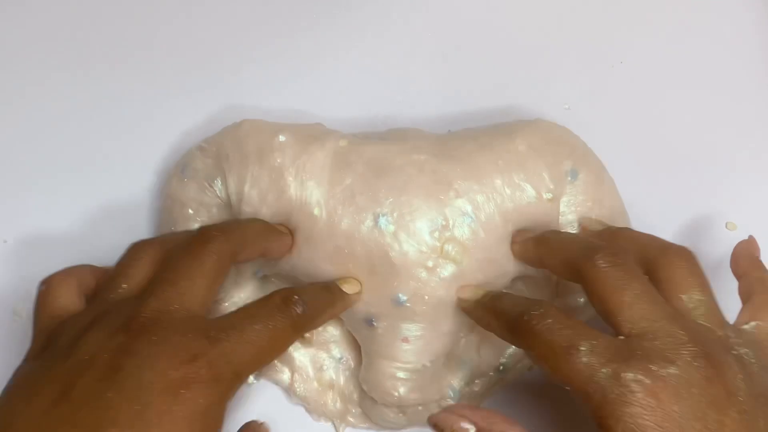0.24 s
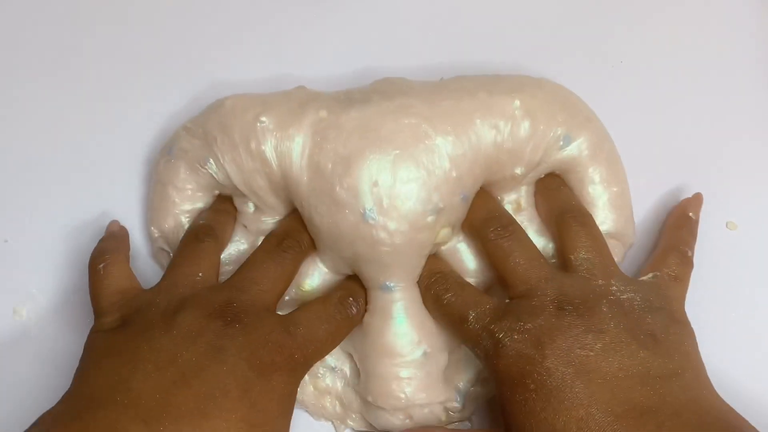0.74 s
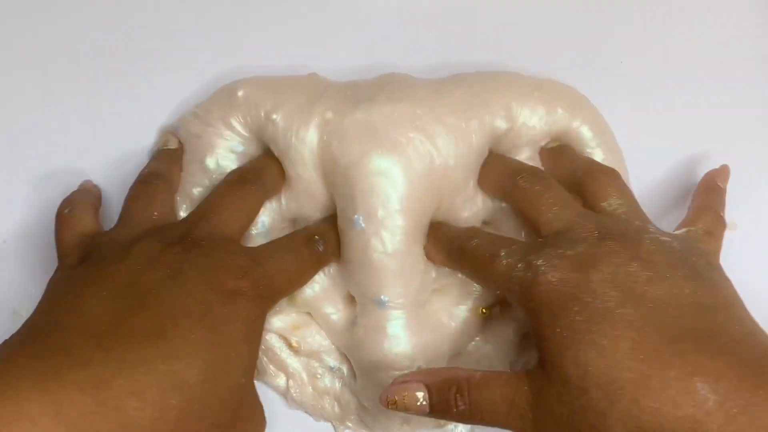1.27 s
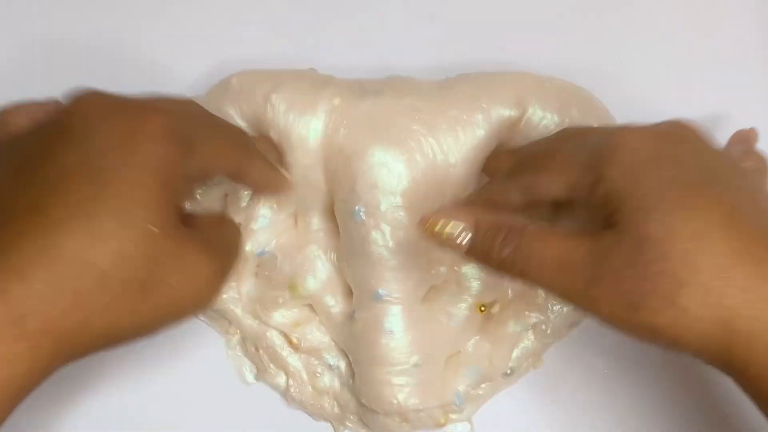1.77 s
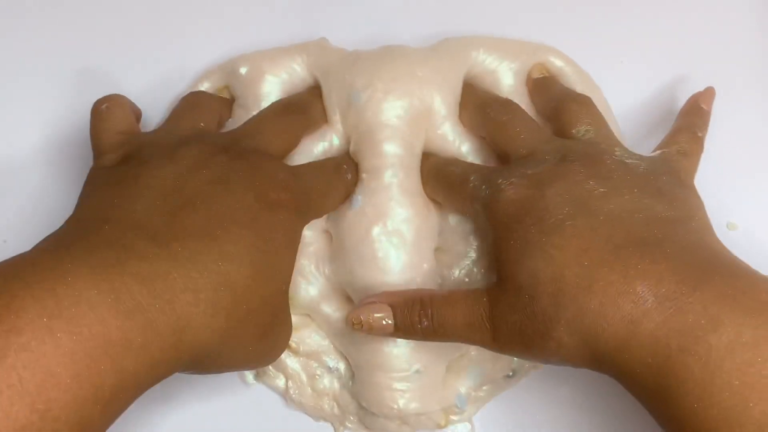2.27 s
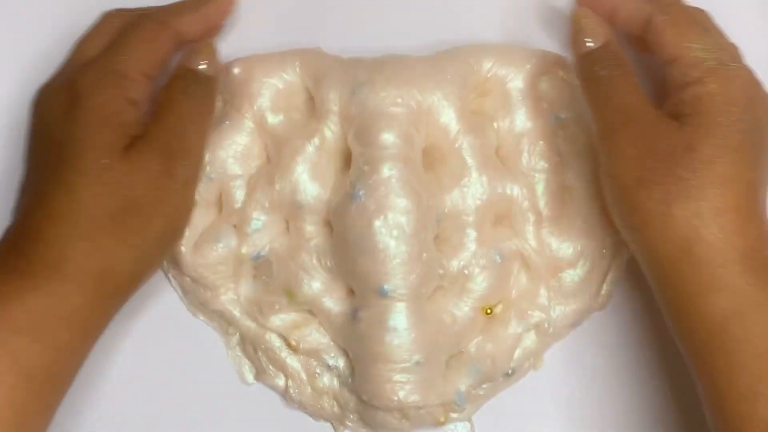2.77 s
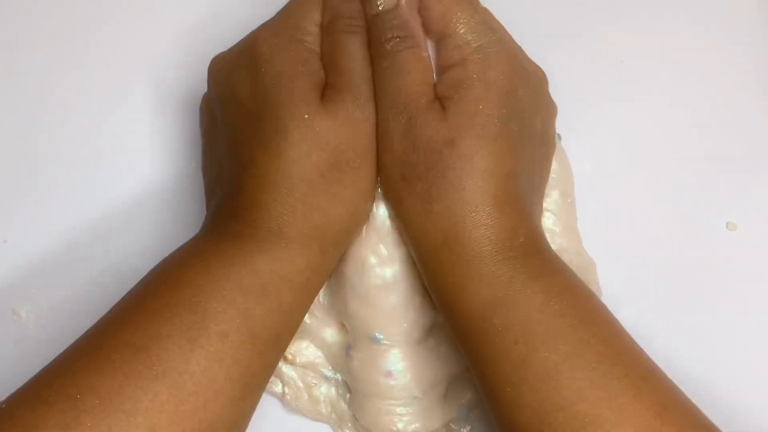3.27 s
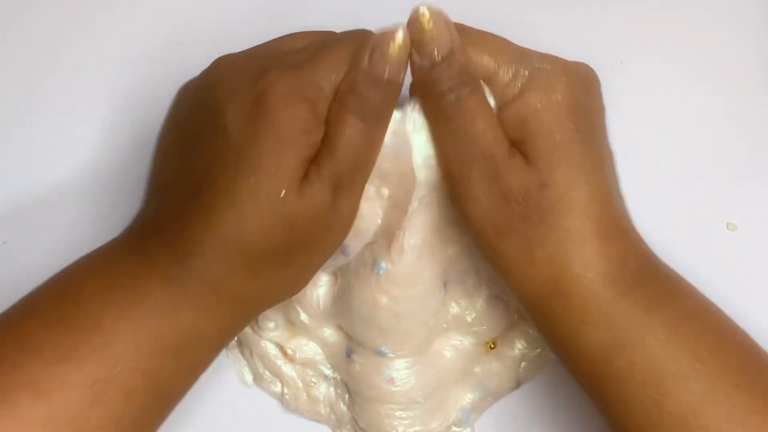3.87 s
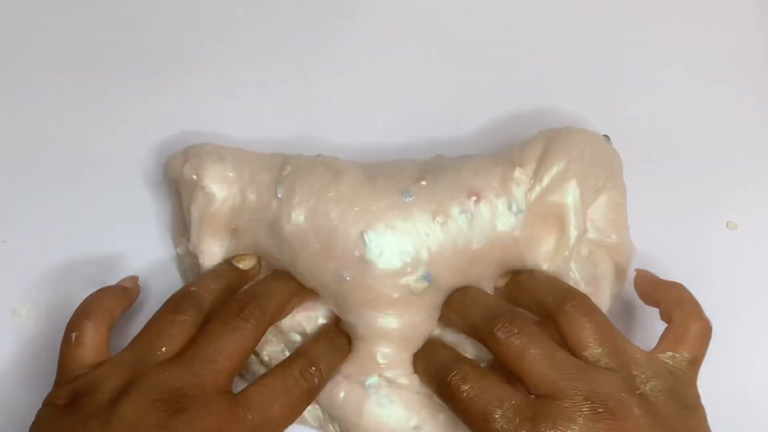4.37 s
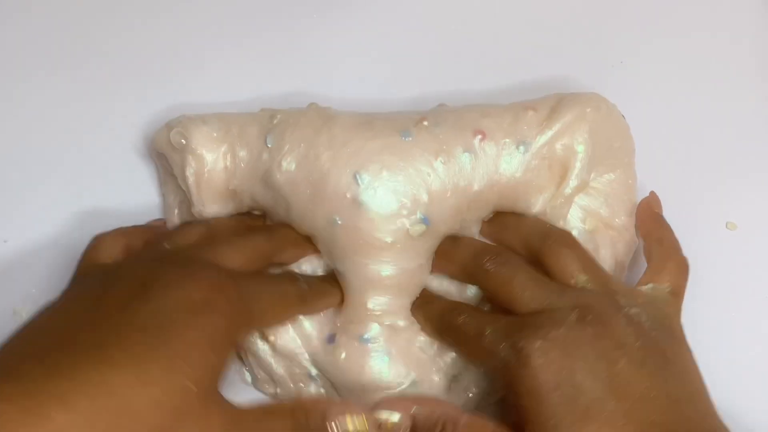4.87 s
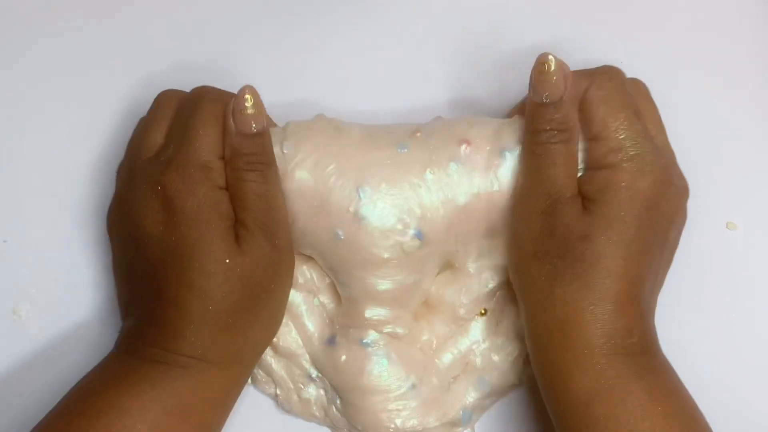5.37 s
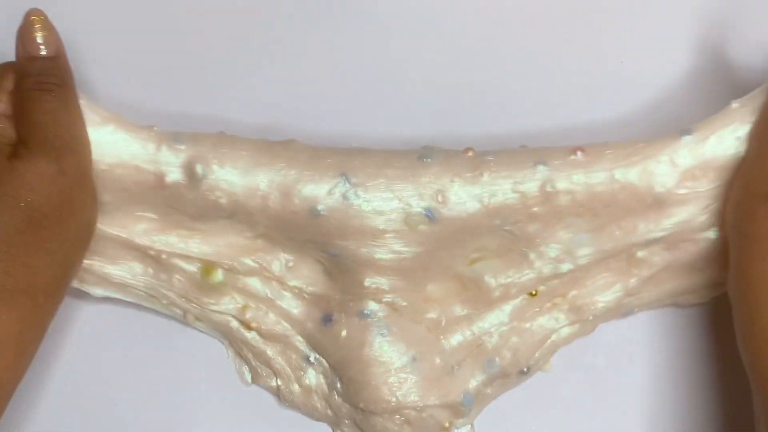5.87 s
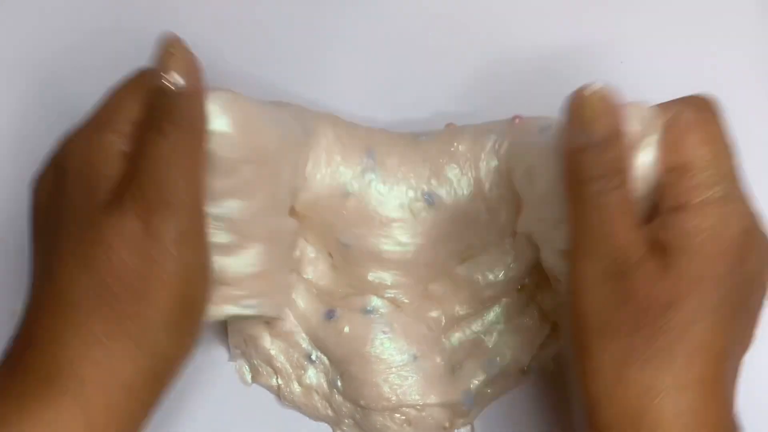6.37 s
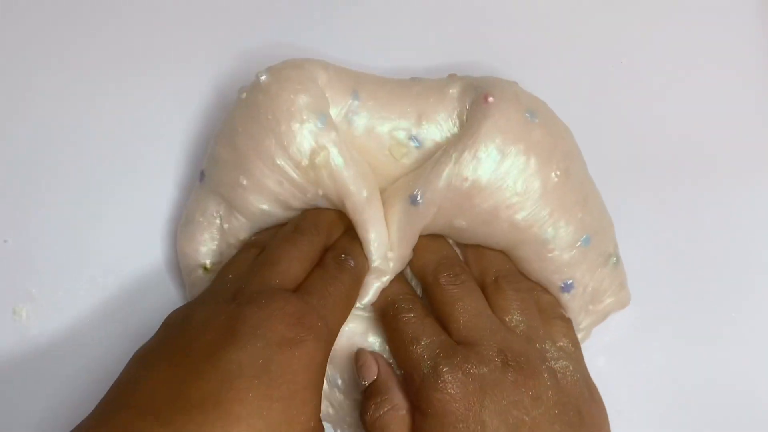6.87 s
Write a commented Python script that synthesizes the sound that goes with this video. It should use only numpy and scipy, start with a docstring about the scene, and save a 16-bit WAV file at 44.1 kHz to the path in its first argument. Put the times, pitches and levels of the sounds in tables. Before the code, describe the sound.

Close, dry indoor sound of hands working a big lump of wet slime on a table, with faint steady hiss. A low, padded thump and wet squelch open at 0 s; similar presses follow at 0.9, 1.7 and 2.5 s, the third with juicier pops, with quiet sticky ticks and small soft bumps between. From 2.7 s the slime is swept together with wet smearing; at 3.1-3.6 s squeezing bursts trapped air in a dense volley of loud, sharp, crackling pops, harshest around 3.4 s and distorting slightly. Folding smears and fizzes until 4 s. Quieter fingering and nudges lead to another deep press at 4.9 s. From 5.1 s the slime is gripped and stretched, with bright snaps and crackles strongest at 5.5 and 5.9 s, thinning past 6.1 s. The last second is soft sticky handling, faint ticks and gentle bumps, with short small-room echoes.

```python
"""A low table thump and a wet squelch open the scene: two hands press soft slime, five times in all.
Between and after the presses they fold and stretch it: noise through drifting resonances smears, random
snaps fizz. Trapped bubbles burst as sharp pops, each a noise tear coloured by its air pocket; small ones tick.
Pops and squelches gain short echoes of a small room; the microphone is close and peaks clip at full scale."""
import sys
import numpy as np
from scipy import signal
from scipy.fft import rfft, irfft, next_fast_len
from scipy.io import wavfile
from scipy.ndimage import uniform_filter1d

SR = 44100
rng = np.random.default_rng(int(sys.argv[2]) if len(sys.argv) > 2 else 0)


def file_out(sig):
    """Save sig as 16-bit WAV at sys.argv[1]."""
    # one column per channel
    cols = np.atleast_2d(sig).T
    # limit, then scale
    lim = np.clip(cols, -1, 1)
    pcm = np.round(lim * 32767).astype(np.int16)
    wavfile.write(sys.argv[1], SR, pcm)


N = 314433

# Both hands press down. Each row: time in s, fingers in dB, palms in dB, palm pitch in Hz, sway against the
# palms in dB, squelch in dB before the mix gain, pocket pitch in Hz, treble setting in dB, squelch fall in s.
PRESSES = [(0.004, -16.5, -3, 98.8, -1.5, -22, 1280, -4, 0.033),
           (0.896, -10.5, -3, 102, -10.5, -15.5, 5830, -13, 0.018),
           (1.712, -10.5, -14, 89, 6.5, -15, 1920, -4, 0.016),
           (2.522, -19.5, -6.5, 105.6, 0, -18.5, 1110, -4.5, 0.031),
           (4.888, -12, -5.5, 107.5, -8, -23.5, 1430, -5, 0.028)]
# slime held off the table passes on less pocket bass and rumble
LIFT_START_S, LIFT_END_S, LIFTED_BASS_DB, LIFTED_RUMBLE_DB = 5.43, 6.12, -11, -0.5
LEAD_S = 1 / 4  # squelches and thumps start this long before their nominal time


def amp(db):
    """Decibels to gain."""
    return 10 ** (np.asarray(db) / 20)


def evened(x):
    """Scales to rms 1."""
    return x / np.sqrt(np.mean(x ** 2) + 1e-20)


def read(points, hz):
    """Interpolates (Hz, value) points on a log-frequency axis."""
    f, value = np.transpose(points)
    return np.interp(np.log(hz + 1), np.log(f + 1), value)


def add(mix, s, sound):
    """Mixes a sound in from time s, cutting what falls outside."""
    start = round(s * SR)
    sound = sound[max(-start, 0):]
    part = mix[max(start, 0):][:len(sound)]
    part += sound[:len(part)]


def play(table, source, lead_s=0):
    """Sounds every row of a table, each lead_s before its time."""
    out = np.zeros(N)
    for s, *row in table:
        add(out, s - lead_s, source(*row))
    return out


def bins(x):
    """Frequencies of the spectrum of x."""
    return np.fft.rfftfreq(len(x), 1 / SR)


def colour(x, db):
    """Minimum-phase filter from a dB curve: whatever rings comes after the blow."""
    cepstrum = irfft(np.log(amp(np.maximum(db, -100))), len(x))
    cepstrum[1:len(x) // 2] *= 2
    cepstrum[len(x) // 2 + 1:] = 0
    return irfft(rfft(x) * np.exp(rfft(cepstrum)), len(x))


def cavity(hz, centre_hz, q):
    """Resonance gain, 1 at its centre."""
    return 1 / np.sqrt(1 + (q * (hz / centre_hz - centre_hz / (hz + 1))) ** 2)


def tone(hz, bass_db, treble_db):
    """Broad colour of escaping air, in dB."""
    points = [(60, bass_db - 17), (300, bass_db + 3.5), (750, bass_db), (2000, 0.26), (3500, 1.0),
              (5200, treble_db / 2 + 0.5), (8000, treble_db + 2), (15000, treble_db - 4.5)]
    return read(points, hz)


def lifted(s):
    """Whether the slime is held off the table at time s."""
    return (s > LIFT_START_S) & (s < LIFT_END_S)


def bass(s, pitch_hz):
    """Bass setting of an air pocket in dB, from its pitch and whether the slime lies on the table."""
    # Each row: pocket pitch in Hz, bass in dB.
    pocket_bass = [(600, 12.5), (900, 12), (2000, -2.5), (3500, 0.5), (7500, 4), (13000, -3)]
    return read(pocket_bass, pitch_hz) + LIFTED_BASS_DB * lifted(s)


def with_bass(table):
    """Gives each air pocket of a table its bass."""
    return [(s, db, hz, bass(s, hz), *rest) for s, db, hz, *rest in table]


def crackle(size, per_s, spread_db, hiss):
    """Countless tiny films snap, a few of them large, over a little steady hiss."""
    chance, strength = rng.random(size), rng.exponential(1, size)
    polarity, air = np.sign(rng.normal(size=size)), rng.normal(size=size)
    snaps = (chance < per_s / SR) * amp(spread_db * np.minimum(strength, 3)) * polarity
    return evened(evened(snaps) + hiss * air)


def wet_crackle(size, per_s, spread_db, hiss, clump_db=2.0, q=3.15):
    """Tiny bubbles of 14 pitches burst in clumps, each with its own short ring, over hiss."""
    bubble_hz = np.geomspace(500, 14000, num=14)
    hz = np.fft.rfftfreq(size, 1 / SR)
    spectrum = np.zeros(len(hz), complex)
    for pitch_hz in bubble_hz:
        chance, strength = rng.random(size), rng.exponential(1, size)
        bursting = chance < per_s / len(bubble_hz) / SR
        bursts = np.where(bursting, amp(spread_db * np.minimum(strength, 3)), 0)
        spectrum += rfft(bursts) / (1 + 1j * q * (hz / pitch_hz - pitch_hz / (hz + 1)))
    bubbles = evened(irfft(spectrum, size))
    clumps = evened(uniform_filter1d(uniform_filter1d(rng.standard_normal(size), 200), 150))
    wet = bubbles + hiss * rng.standard_normal(size)
    return evened(wet * amp(clump_db * np.clip(clumps, -2, 2)))


def drifting_gaps(x, q=9, drift=.1):
    """Narrow gaps between skin and slime resonate; their pitches wander, so the smear sounds wet."""
    # Each row: centre in Hz, boost in dB.
    gaps = [(800, 3), (1150, 3.5), (1500, 7), (2050, 10.5)]
    hz, when, z = signal.stft(x, SR, nperseg=1024, noverlap=768)
    for centre_hz, db in gaps:
        wander = evened(uniform_filter1d(uniform_filter1d(rng.standard_normal(len(when)), 16), 10))
        z = z * amp(db * cavity(hz[:, None], centre_hz * np.exp(drift * wander), q))
    return signal.istft(z, SR, nperseg=1024, noverlap=768)[1][:len(x)]


def hands():
    """Levels in dB of leaning, smearing and sticking over time, with resting noise; powers add."""
    # Fingertips pull free and dig in. Each row: start in s, end in s, smearing in dB, sticky fizz in dB.
    fingering = [(0.197, 0.6, -57.5, -65), (1.11, 1.46, -56.5, -62.5), (1.982, 2.2, -53.5, -59.5),
                 (4.063, 4.164, -57.5, -55.5), (4.457, 4.704, -54.5, -62), (6.417, 7.1, -58, -57)]
    # Strokes. Each row: time in s, smearing in dB, sticky fizz in dB. All levels precede the handling gains.
    gather = [(2.70, -44, -70), (2.78, -39, -57.5), (2.88, -40.5, -56), (2.95, -27, -30), (3.09, -38, -39),
              (3.3, -38.5, -36), (3.46, -38, -24.5), (3.58, -44.5, -33.5), (3.69, -56, -51)]  # sweep together and squeeze
    fold = [(3.689, -51, -46), (3.77, -35, -30.5), (3.85, -35, -29.5), (3.941, -40, -41),
            (4.021, -57.5, -55)]  # fold over
    stretch = [(5.09, -50.5, -68), (5.111, -46, -59), (5.26, -42, -56.5), (5.36, -39.5, -40.5),
               (5.46, -42, -38), (5.54, -42, -36), (5.72, -39.5, -29.5), (5.79, -50.5, -44.5),
               (5.92, -52.5, -33), (6.04, -72, -60), (6.31, -52, -44), (6.5, -54, -55)]  # slide to the ends, grip, pull wide, let back
    resting_db = (-67.5, -64)  # faint low noise, steady microphone hiss
    fingering_ease_s = 0.094
    # skin rubs around each press: smearing and fizz against its squelch level
    rub_offset_db, rub_swell_db_per_s, rub_fade_db_per_s = (-12.5, -15.5), 286, 184
    # the weight stays on after a press and eases off
    lean_db, lean_db_per_s = -25.5, -32
    # the table rumbles with the smearing, over a little rumble of its own
    drag_db, table_rest_db = 10, -43.5

    t = np.arange(N) / SR
    power, leaning = amp(resting_db)[:, None] ** 2, 0
    for start, end, *levels in fingering:
        active = np.clip(np.minimum(t - start, end - t) / fingering_ease_s + .5, 0, 1)
        power = power + amp(levels)[:, None] ** 2 * active
    for stroke in (gather, fold, stretch):
        s, *levels = np.transpose(stroke)
        stroke_power = np.array([amp(np.interp(t, s, db)) ** 2 for db in levels])
        power = power + stroke_power * (t >= s[0]) * (t < s[-1])
    for s, _, _, _, _, squelch_db, *_ in PRESSES:
        rub_db = squelch_db - np.maximum(rub_swell_db_per_s * (s - t), rub_fade_db_per_s * (t - s))
        power = power + (amp(rub_offset_db)[:, None] * amp(rub_db)) ** 2
        leaning = leaning + (t > s) * amp(lean_db + lean_db_per_s * abs(t - s)) ** 2
    drag = amp(drag_db + LIFTED_RUMBLE_DB * lifted(t)) ** 2 * power[0]
    weight = amp(table_rest_db) ** 2 + leaning + drag
    return 10 * np.log10([weight, *power])


def handling(weight_db, smearing_db, sticking_db, rumble_gain_db=0, smear_gain_db=1, fizz_gain_db=1):
    """Weight shifts rumble on the table, skin smears over the slime, its sticky surface fizzes over hiss."""
    # Noise colours. Each row: frequency in Hz, relative density in dB.
    rumble_colour = [(10, -17), (25, -2.5), (35, -0.5), (50, -6.5), (75, -8.5), (108, -7), (150, -22.5),
                     (250, -27.5), (500, -33.5), (1200, -79)]
    smear_colour = [(120, -15.5), (300, 1), (600, 2.5), (800, 2), (1000, -7.5), (1450, -3), (1750, -12),
                    (2050, -7), (2800, -15.5), (5000, -30.5)]
    fizz_colour = [(1200, -31.5), (2400, -4), (3400, 9), (5000, 3), (7800, 5.5), (10500, -2), (15500, 1),
                   (17000, -8)]
    size = next_fast_len(N, real=True)
    noise = rng.standard_normal(size)
    hz = bins(noise)
    rumble = evened(colour(noise, read(rumble_colour, hz)))[:N]

    sliding = wet_crackle(size=size, per_s=3000, spread_db=5.5, hiss=.5)
    smear = evened(drifting_gaps(colour(sliding, read(smear_colour, hz))))[:N]

    films = crackle(size=size, per_s=900, spread_db=8, hiss=.5)
    bubbles = wet_crackle(size=size, per_s=1400, spread_db=8, hiss=.3)
    grains = evened(colour(films / 2 + bubbles, read(fizz_colour, hz)))[:N]
    hiss = evened(colour(rng.standard_normal(size), read(fizz_colour, hz)))[:N]
    # mostly smooth microphone hiss at rest; the harder the pull, the more separate snaps
    grainy = np.interp(sticking_db, [-50, -32], [.06, .7])
    fizz = np.sqrt(grainy) * grains + np.sqrt(1 - grainy) * hiss

    sound = amp(rumble_gain_db + weight_db) * rumble
    sound += amp(smear_gain_db + smearing_db) * smear
    return sound + amp(fizz_gain_db + sticking_db) * fizz


def thump(level_db, pitch_hz, rise_s, fall_s, knock_db, sway_db):
    """The soft lump bounces at a low pitch, the table top knocks, and the whole table sways afterwards."""
    # Ringing of the table top. Each row: pitch in Hz, width setting in Hz, relative level in dB.
    table_modes = [(157, 34, 4), (209.2, 17, -6), (245.5, 19, 6), (339, 55, -5.5), (423.4, 110, -6),
                   (571, 57, -11.5), (760, 170, -21)]
    sway_hz, sway_t60_s, sway_build_s = 35.58, 0.63, 0.011
    t = np.arange(-SR // 4, SR // 2) / SR
    swell = np.exp(np.where(t < 0, -(t / rise_s) ** 2, -t / abs(fall_s)))
    waver = evened(uniform_filter1d(rng.standard_normal(len(t)), 500))
    bounce = np.sin(2 * np.pi * np.cumsum(pitch_hz * (1 + 0.1 * waver)) / SR)

    push = rng.standard_normal(len(t))
    modes = sum(amp(db) * cavity(bins(push), f, f / width) ** 2 for f, width, db in table_modes)
    knock = swell * colour(push, 20 * np.log10(modes + 1e-9))
    knock *= np.linalg.norm(swell) / np.linalg.norm(knock)

    after = np.maximum(t, 0)
    sway = np.sin(2 * np.pi * sway_hz * after) * (1 - np.exp(-after / sway_build_s))
    sway *= amp(-60 * after / sway_t60_s)
    return amp(level_db) * (swell * evened(bounce) + amp(knock_db) * knock + amp(sway_db) * sway)


def nudges():
    """Thump rows of the lump nudged or set down."""
    # Each row: time in s, level in dB, pitch in Hz, knock in dB, sway in dB (both against the level).
    nudge_rows = [(0.496, -27.5, 103.3, -27, -5), (2.164, -24.5, 102.4, -27.5, 2.5),
                  (2.746, -21.5, 99.4, -15, -8.5), (2.985, -18, 115.7, -14, 3),
                  (3.18, -23.5, 144.3, -8.5, -16), (3.783, -27.5, 136, -5, -18),
                  (4.374, -25, 118, -10.5, 0), (4.614, -20.5, 116, -24, -22), (5.12, -19.5, 108.8, -16, -2),
                  (6.52, -38.5, 94.5, -12.5, -18), (6.648, -34, 108.5, -21.5, -19),
                  (6.915, -31, 93.3, -6.5, 6.5)]
    rise_s, fall_s = 0.014, 0.035
    return [(s, db, hz, rise_s, fall_s, knock_db, sway_db) for s, db, hz, knock_db, sway_db in nudge_rows]


def presses():
    """Fingers knock, air squelches, palms follow with a duller, lower thump: (thump rows, squelch rows)."""
    finger_hz, finger_rise_s, finger_fall_s, finger_knock_db = 129.3, 0.024, 0.037, -0.5
    palm_lag_s, palm_rise_s, palm_fall_s, palm_knock_db = 0.035, 0.03, 0.024, -17
    squelch_rise_s, squelch_bass_db = 0.015, 5
    thumps, squelches = [], []
    for s, finger_db, palm_db, palm_hz, sway_db, squelch_db, pocket_hz, treble_db, fall_s in PRESSES:
        thumps.append((s, finger_db, finger_hz, finger_rise_s, finger_fall_s, finger_knock_db, -np.inf))
        thumps.append((s + palm_lag_s, palm_db, palm_hz, palm_rise_s, palm_fall_s, palm_knock_db, sway_db))
        squelches.append((s, squelch_db, pocket_hz, squelch_bass_db, treble_db, squelch_rise_s, fall_s))
    return thumps, squelches


def squelch(level_db, pitch_hz, bass_db, treble_db, rise_s, fall_s, pocket_db=9, q=3):
    """A rush of bursting bubbles swells and dies, coloured by the air pocket that it empties."""
    t = np.arange(2 ** 15) / SR - LEAD_S
    swell = np.exp(np.where(t < 0, t / abs(rise_s), -t / abs(fall_s)))
    rush = wet_crackle(size=len(t), per_s=7000, spread_db=5.5, hiss=.4)
    hz = bins(rush)
    sound = swell * colour(rush, tone(hz, bass_db, treble_db) + pocket_db * cavity(hz, pitch_hz, q))
    return amp(level_db) * sound * np.linalg.norm(swell) / np.linalg.norm(sound)


def squelches_of_folding():
    """Squelch rows of air squeezed out while folding and pulling."""
    # Each row: peak time in s, level in dB before the mix gain, pocket pitch in Hz, treble setting in dB,
    # rise in s, fall in s.
    squelch_rows = [(0.35, -44.5, 9100, -6, 0.014, 0.014), (1.422, -44.5, 3000, -8.5, 0.014, 0.012),
                    (1.845, -46.5, 13000, -5, 0.0073, 0.012), (2.722, -32, 2100, -13.5, 0.0037, 0.055),
                    (2.915, -29.5, 1490, -25, 0.025, 0.023), (3.205, -33, 3000, -11, 0.016, 0.01),
                    (3.368, -8.5, 9000, -1, 0.0028, 0.0076), (3.418, -3.5, 6060, 12, 0.0068, 0.012),
                    (4.338, -31, 8000, -9.5, 0.0016, 0.039), (5.32, -31, 2570, -16, 0.016, 0.035),
                    (5.505, -18.5, 10900, -8.5, 0.01, 0.0094), (5.563, -22, 8500, 2, 0.0059, 0.0055),
                    (5.893, -24, 7700, 13, 0.0044, 0.0076), (6.279, -20.5, 7660, -2.5, 0.0079, 0.011),
                    (6.61, -47.5, 1680, -10, 0.028, 0.038)]
    return with_bass(squelch_rows)


def pop(level_db, pitch_hz, bass_db, treble_db, tear_ms, ring_db=5, snap=1.0, linger=0.89):
    """A film snaps and tears open; the soft-walled air pocket behind it rings for a few cycles."""
    ms = np.arange(2048) / SR * 1000
    tear = crackle(size=len(ms), per_s=9000, spread_db=2, hiss=0.23)
    tear *= np.exp(-ms / (linger * abs(tear_ms) + 0.046))
    tear /= np.linalg.norm(tear)
    tear[0] = snap / max(tear_ms, .3)
    hz = bins(tear)
    pocket = cavity(hz, pitch_hz, 3.5)
    sound = colour(tear, tone(hz, bass_db, treble_db) + 20 * np.log10(1 + amp(ring_db) * pocket))
    # level: rms if the energy were spread over 10 ms
    return amp(level_db) * sound / np.linalg.norm(sound) * np.sqrt(0.01 * SR)


def ticks(sticking_db, count):
    """Small bubbles burst at random, louder the stickier the pull; rows as for the bigger pops."""
    least_db, spread_db = 0, 4.5  # above the level set by the fizz
    low_hz, high_hz, treble_db, tear_mid_ms = 1200, 13900, -2, 1.5
    growth, even_db = 0.095, -46  # extra dB per dB of fizz, relative to even_db
    rows = []
    for k, (when, size, pitch, tear) in enumerate(rng.random((count, 4))):
        at = int((k + when) / count * N)
        fizz_db = sticking_db[at] + growth * (sticking_db[at] - even_db)
        level_db = fizz_db + least_db + spread_db * min(-np.log(1 - size), 3)
        pitch_hz = low_hz * (high_hz / low_hz) ** pitch
        rows.append((at / SR, level_db, pitch_hz, treble_db, tear_mid_ms * (.5 + tear)))
    return rows


def bubble_pops(sticking_db):
    """Pop rows of the bigger bubbles and the ticks."""
    # Each row: time in s, level in dB before the mix gain, cavity pitch in Hz, treble setting in dB,
    # tearing time setting in ms.
    pop_rows = [(0.1941, -44.5, 14000, -3, 3.6), (0.2262, -40.5, 7710, 7, 6.1),
                (0.3945, -34.5, 770, -44, 3.5), (0.478, -43.5, 895, -17, 4.2), (0.637, -48, 577, -26, 3.1),
                (0.89, -17, 605, 9, 15), (1.0556, -43, 900, -6, 0.53), (1.0868, -39.5, 14000, 0, 1.1),
                (1.2916, -30.5, 7800, -4.5, 0.93), (1.3205, -45, 9050, -2, 3.1),
                (1.6672, -26.5, 605, -3.5, 2.7), (1.678, -17, 575, -4, 8.6), (1.694, -9, 3460, 0, 3.5),
                (1.7082, -6.5, 1780, -6.5, 10.7), (1.9883, -41.5, 3750, -5, 3.4),
                (2.0323, -37.5, 9250, -13, 0.7), (2.045, -33, 694, -6, 3), (2.0875, -43, 3400, -12, 0.5),
                (2.1208, -41.5, 3560, -16, 1.2), (2.203, -44, 11000, 2, 0.97), (2.217, -35, 930, -3, 2.8),
                (2.33, -46, 7120, 4, 1.7), (2.4895, -22.5, 7300, -3, 3.5), (2.521, -15.5, 7400, -6, 4.4),
                (2.7083, -30, 2110, -17, 5.2), (2.8641, -29.5, 3830, 0, 2.8), (2.9774, -18, 820, -11, 0.98),
                (3.0308, -28.5, 1440, -14, 2.6), (3.1256, -19, 10900, -1, 1.4),
                (3.1559, -2, 2100, -12.5, 2.5), (3.2025, -9, 2980, -11, 1.9), (3.2871, -4.5, 1750, -2, 2.7),
                (3.339, -17.5, 523, -3, 1.3), (3.3568, -5.5, 12600, 6, 3.6), (3.3994, -6.5, 3400, 2.5, 2.8),
                (3.4073, 4, 3630, 2, 2.1), (3.4742, -4, 12200, 12, 0.31), (3.4813, -10.5, 9190, -6.5, 4),
                (3.5227, -0.5, 7450, 3.5, 1.1), (3.6007, -16, 13200, 28, 0.35),
                (3.6206, -14, 3300, 3, 0.89), (3.7191, -19.5, 14100, 0, 1.8), (3.7286, -18, 12700, 7, 0.43),
                (3.7768, -28, 3340, -15, 1.1), (3.8469, -22, 7500, -2, 2.9), (3.9586, -34, 2260, -3, 2.7),
                (4.113, -37.5, 10150, 4, 3.7), (4.3246, -15.5, 7800, -8.5, 3.7),
                (4.6758, -41.5, 1400, -7, 7.7), (4.876, -25, 1457, -5, 3.4), (5.0998, -32, 2080, -10, 3.6),
                (5.3801, -26.5, 3470, -6, 1.4), (5.408, -23, 6290, -0.5, 0.82),
                (5.4236, -19.5, 3700, -15, 2), (5.4741, -6.5, 7200, 7, 0.86),
                (5.5007, -10.5, 12400, 15, 1.4), (5.508, -11.5, 10400, 18, 1.6),
                (5.5315, -10, 6560, -13, 1.2), (5.544, -18, 3040, -2, 1.9), (5.558, -13.5, 8650, 5, 2.7),
                (5.6579, -25, 8140, -9.5, 1.4), (5.6888, -19, 3500, -11, 1.7),
                (5.6958, -15.5, 7600, 24, 1.7), (5.7256, -22.5, 12270, 25, 1.8),
                (5.7398, -22, 12600, 9, 3.8), (5.809, -15.5, 13000, -1.5, 3.5), (5.826, -18, 4300, 3, 0.41),
                (5.847, -21, 4480, -5, 0.2), (5.8716, -26, 4390, -8, 0.72), (5.8801, -7, 7640, -5.5, 2.6),
                (5.8935, -12.5, 13500, 5, 1.4), (5.9435, -27.5, 4410, -2, 0.47),
                (5.959, -29, 14000, 16, 0.4), (6.0027, -30, 9540, -3, 1.9), (6.0237, -29.5, 14000, 7, 2.8),
                (6.0588, -17, 3670, -6, 1.6), (6.0907, -23, 12900, 23, 3), (6.102, -26.5, 9220, -7, 1.4),
                (6.481, -41.5, 654, -23, 0.54), (6.627, -38.5, 1640, -3, 5.3),
                (6.7345, -36.5, 5370, -8, 0.45), (6.7866, -43.5, 645, -10, 2.8),
                (6.9261, -32, 3300, -18, 0.64), (6.968, -35, 3940, -17, 1.7), (7.0046, -26, 3570, 0.5, 6.9),
                (7.0376, -37, 3230, -8, 0.49)]
    return with_bass(pop_rows + ticks(sticking_db, count=160))


def room(x, tail_db=-15, scatter_db=-11, scatter_s=0.0053):
    """Echoes from the table, scatter from hands and nearby things, and a short room tail."""
    # Each row: frequency in Hz, reverberation time in s.
    room_t60 = [(200, 0.58), (1500, 0.38), (4000, 0.18), (8000, 0.2), (16000, 0.26)]
    # Table top and nearby surfaces. Each row: delay in ms, gain against the direct sound.
    echoes = [(1.4, 0.084), (2.3, -0.11), (3.7, -0.056), (5.2, 0.1), (7.4, 0.11), (9.7, -0.019)]
    t = np.arange(SR // 2) / SR
    hz, when, z = signal.stft(rng.standard_normal(len(t)), SR, nperseg=256)
    decay = amp(-60 * when / read(room_t60, hz)[:, None])
    tail = signal.istft(z * decay, SR, nperseg=256)[1][:len(t)]
    tail *= np.minimum(t / 0.0054, 1)
    scatter = rng.standard_normal(len(t)) * np.exp(-t / scatter_s) * (t > .001)
    response = amp(tail_db) * tail / np.linalg.norm(tail)
    response += amp(scatter_db) * scatter / np.linalg.norm(scatter)
    response[0] = 1
    for ms, gain in echoes:
        response[round(ms * SR / 1000)] += gain
    return signal.fftconvolve(x, response / np.linalg.norm(response))[:N]


def scene():
    """All the sounds reach one microphone, which feeds both channels."""
    squelch_gain_db, pop_gain_db = 0.87, 1.0
    weight_db, smearing_db, sticking_db = hands()
    press_thumps, press_squelches = presses()
    background = handling(weight_db, smearing_db, sticking_db)
    thumps = play(press_thumps + nudges(), thump, lead_s=LEAD_S)
    squelches = play(press_squelches + squelches_of_folding(), squelch, lead_s=LEAD_S)
    pops = play(bubble_pops(sticking_db), pop)
    bursts = amp(pop_gain_db) * pops + amp(squelch_gain_db) * squelches
    sound = room(bursts) + background + thumps
    return np.array([sound, sound])


def record(dry):
    """The recorder clips at full scale, then limits its band."""
    edge_hz = 16100
    clipped = np.clip(dry, -1, 1)
    lowpass = signal.firwin(255, edge_hz, window=("kaiser", 7), fs=SR)
    return signal.oaconvolve(clipped, lowpass[None], "same")


dry = scene()
out = record(dry)
file_out(out)
```